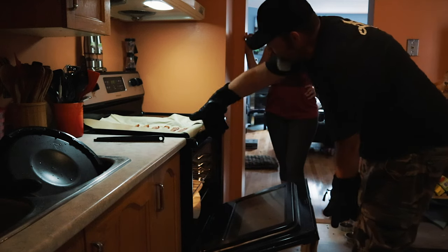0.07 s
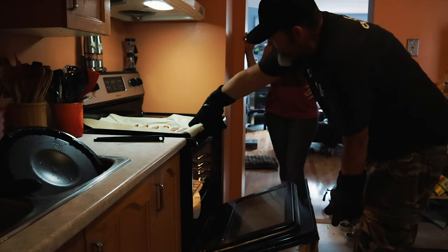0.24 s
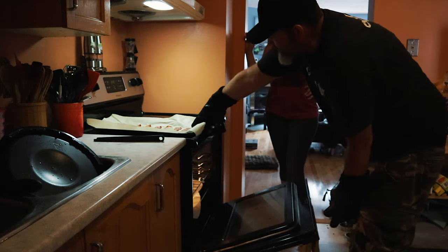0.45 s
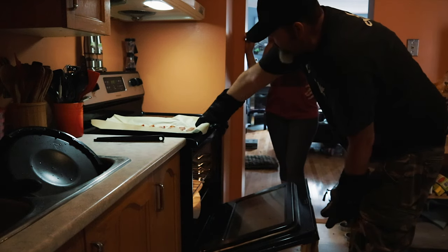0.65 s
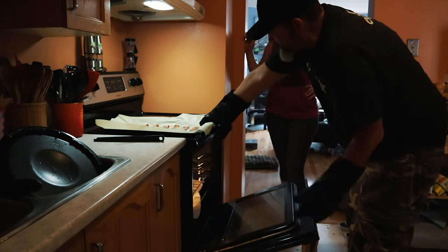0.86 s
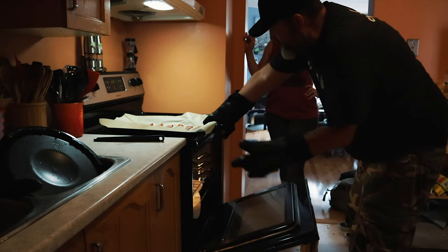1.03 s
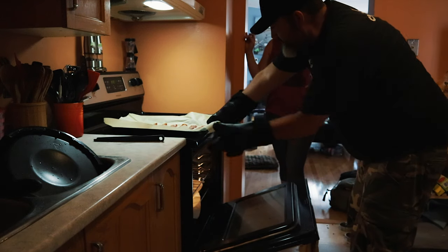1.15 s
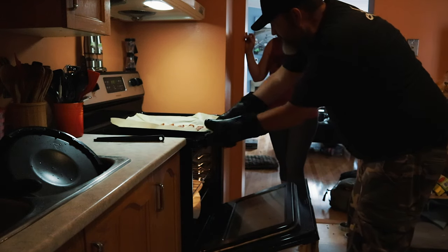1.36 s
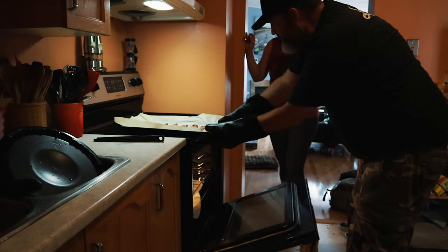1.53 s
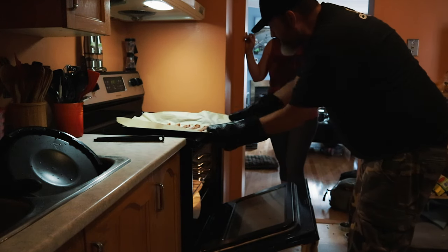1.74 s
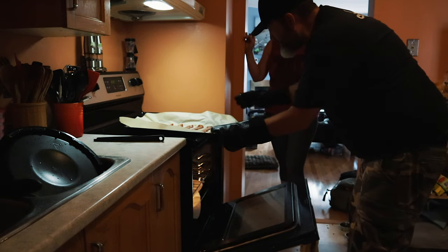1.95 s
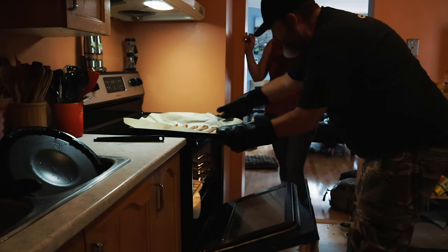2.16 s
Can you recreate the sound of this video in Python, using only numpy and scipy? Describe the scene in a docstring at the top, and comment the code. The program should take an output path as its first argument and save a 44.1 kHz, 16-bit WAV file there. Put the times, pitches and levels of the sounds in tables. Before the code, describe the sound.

A metal sheet pan starts scraping along a hard surface at 0.2 seconds, with small squeaks and crinkling from its paper lining. It knocks down twice, at about 0.85 and 1.0 seconds, ringing briefly. After a short pause, a second scrape runs from 1.4 to 1.9 seconds with thin squeals, paper rustle and soft thumps, then fades. The sound is close, over a faint kitchen appliance hum.

```python
"""In a kitchen, gloved hands tug a paper-lined sheet pan along a hard surface. Sliding friction makes
the pan scrape, drone and squeal; the paper hisses and its creases snap. The pan knocks down twice,
ringing its modes, and flexes with low thumps. An appliance rumbles behind and the walls reverberate.
Two close microphone ports hear the bass alike and the treble differently."""
import sys
import numpy as np
from scipy import signal
from scipy.fft import rfft, irfft, next_fast_len
from scipy.io import wavfile
from scipy.ndimage import map_coordinates

SR = 44100
rng = np.random.default_rng(int(sys.argv[2]) if len(sys.argv) > 2 else 0)


def persist_wave(psi):
    """Save psi, clipped to +-1, as 16-bit WAV."""
    counts = np.round(np.clip(psi, -1, 1) * 32767).astype(np.int16)
    wavfile.write(sys.argv[1], SR, np.atleast_2d(counts).T)


N = 97020

# Normal modes of the pan: (frequency [Hz], level [dB], decay time T60 [s])
PAN_MODES = [(158.6, -8.5, 0.92), (339, -5.5, 0.12), (506, 3, 0.077), (615, 7.5, 0.086), (800.5, -6, 0.28),
             (987, 6.5, 0.12), (1424, -18, 0.61), (1880, -9, 0.087), (1917, -12, 0.076), (2260, 9.5, 0.017),
             (2760, 2, 0.061), (2920, 1, 0.055), (3340, 2.5, 0.033)]
# Spectrum of the room air: (frequency [Hz], relative spectral density [dB])
AIR_SPECTRUM = [(120, -30), (200, -10), (455, -8), (541, -11), (1170, -15), (13000, -41.5)]


def amp(db):
    """Amplitude ratio of a level in decibels."""
    return 10 ** (np.asarray(db) / 20)


def unit_rms(x):
    """Normalisation to a mean square of one."""
    return x / np.sqrt(np.mean(x ** 2) + 1e-20)


def gain_at(points, f):
    """Amplitude response from (frequency [Hz], level [dB]) points joined on a log frequency axis."""
    hz, db = np.transpose(points)
    return amp(np.interp(np.log(f + 1), np.log(hz + 1), db))


def wobble(knots_per_s):
    """Smooth random modulation: a spline through Gaussian values."""
    knots = rng.standard_normal(int(N * knots_per_s / SR) + 4)
    return map_coordinates(knots, [np.arange(N) * knots_per_s / SR])


def filtered(x, response):
    """Linear filtering: the spectrum is multiplied by a complex frequency response."""
    size = next_fast_len(N + SR // 2)
    return irfft(rfft(x, size) * response(np.fft.rfftfreq(size, 1 / SR)), size)[..., :N]


def coloured_noise(response):
    """Spectral shaping of white noise, scaled to unit RMS."""
    return unit_rms(filtered(rng.standard_normal(N), response))


def resonance(f, hz, width_hz):
    """Band-pass response of a damped oscillator."""
    return 1j * f * width_hz / (hz * hz - f * f + 1j * f * width_hz)


def sheet_radiation(f, edge_hz=913):
    """Radiation efficiency: thin sheet and paper give off little bass, a fourth-order high-pass."""
    x = 1j * f / edge_hz
    return (x * x / (1 + x + x * x)) ** 2


def tone_pulse(time, length, hz):
    """Wave packet: a sinusoid under a Gaussian envelope centred on the given time."""
    t = np.arange(N) / SR
    return np.exp(-(2 * (t - time) / length) ** 2) * np.sin(2 * np.pi * hz * t)


def add(track, time, sound):
    """Superposition of a sound on the track, starting at the given time."""
    part = track[max(round(time * SR), 0):][:len(sound)]
    part += sound[:len(part)]


def scatter(x, t60, hop, delay=0):
    """Diffuse scattering: each overlapping frame gets its own decaying tail; hop and delay in samples."""
    out = np.zeros(N + SR)
    window = np.hanning(2 * hop + 1)[:-1]
    decay = amp(-60 * np.arange(SR // 3) / SR / t60)
    x = np.pad(x, (hop, 2 * hop))
    for start in range(0, N + hop, hop):
        tail = rng.standard_normal(len(decay)) * decay
        wet = signal.fftconvolve(x[start:start + 2 * hop] * window, tail / np.linalg.norm(tail))
        out[start:start + len(wet)] += wet
    return np.pad(out, (delay, 0))[hop:hop + N]


def room_air():
    """Ambient noise: a broad band whose level drifts and dips briefly."""
    # Course of the room air: (time [s], level [dB])
    air_levels = [(0, -45), (0.499, -54.5), (.8, -47.5), (1.15, -40.5), (1.45, -44), (1.62, -67),
                  (1.8, -44.5), (2.2, -44)]
    level_db = np.interp(np.arange(N) / SR, *np.transpose(air_levels))
    air = coloured_noise(lambda f: gain_at(AIR_SPECTRUM, f))
    return air * amp(level_db + wobble(knots_per_s=9))


def appliance_hum():
    """Narrow-band noise: the appliance's low bands are heard as a wavering hum."""
    # Bands of the hum: (frequency [Hz], bandwidth [Hz], level [dB])
    bands = [(55, 27, -51.5), (103, 36, -46), (164, 43, -50.5)]
    return sum(amp(db) * coloured_noise(lambda f: resonance(f, hz, width) ** 2) for hz, width, db in bands)


def pan_drone():
    """Forced vibration: dragging drives four low modes of the pan into a hollow murmur."""
    # Course of the drone: (time [s], level [dB])
    drone_levels = [(.2, -47.5), (.26, -37), (.33, -48), (1.4, -57), (1.449, -34), (1.56, -35.5),
                    (1.65, -43.5), (1.8, -31.5), (1.951, -64)]
    level_db = np.interp(np.arange(N) / SR, *np.transpose(drone_levels), left=-120, right=-120)
    low_modes = lambda f: sum(resonance(f, hz, width_hz=100) for hz, _, _ in PAN_MODES[2:6])
    return amp(level_db) * coloured_noise(low_modes)


def pan_thumps():
    """Flexure: the bending pan gives soft low pulses with no ring."""
    # Flexes of the pan: (time [s], peak level [dB], frequency [Hz], duration [s])
    flexes = [(0.897, -20.5, 168.8, 0.027), (1.403, -27.5, 164.4, 0.015), (1.487, -22, 150.6, 0.023),
              (1.54, -24.5, 136, 0.025), (2.07, -34.5, 170.2, 0.036)]
    return sum(amp(db) * tone_pulse(time, length, hz) for time, db, hz, length in flexes)


def edge_chirps():
    """Stick-slip: the pan's edge catches and gives short clean chirps."""
    # Catches of the edge: (time [s], peak level [dB], frequency [Hz])
    catches = [(0.3185, -11, 3250), (0.338, -8, 3380), (0.3722, -9.5, 3325), (.390, -26, 3430),
               (0.455, -12, 3450), (.493, -16.5, 3700), (0.834, -18, 3640), (1.7255, -11.5, 3590),
               (1.737, -12, 3600)]
    return sum(amp(db) * tone_pulse(time, length=0.0022, hz=hz) for time, db, hz in catches)


def pan_squeals():
    """Friction-excited resonance: the sliding pan sings in one narrow band for each squeal."""
    # Squeals: (centre time [s], duration [s], frequency [Hz], level [dB])
    squeals = [(.4, 0.25, 3470, -32), (0.484, 0.047, 1720, -29), (1.103, 0.016, 2450, -26),
               (1.53, 0.16, 2010, -28.5), (1.671, .06, 1990, -28), (1.65, 0.11, 2600, -30.5)]
    out, t = np.zeros(N), np.arange(N) / SR
    for time, length, hz, db in squeals:
        swell = np.cos(np.pi * np.clip((t - time) / length, -0.5, 0.5))
        out += amp(db) * swell * coloured_noise(lambda f: resonance(f, hz, width_hz=260) ** 2)
    return out


def pan_knocks():
    """Impact excitation: a short rough force rings the pan's modes over a decaying noisy clatter."""
    # Impacts: (time [s], relative level [dB], low body gain [dB], contact time [s], favoured mode [Hz])
    impacts = [(0.8284, -20, -18, 0.0049, 2200), (0.857, -9.5, -8.5, 0.028, 1920),
               (0.889, -21.5, 3.5, 0.014, 780), (0.994, -14, -6, 0.014, 2300), (1.009, -28, 6, 0.014, 330),
               (1.879, -38.5, 7, 0.017, 500)]
    # Spectrum of the clatter: (frequency [Hz], relative spectral density [dB])
    clatter_spectrum = [(71, -30), (120, 4), (234, 5.5), (599, 14), (908, 7.5), (1940, 7), (9000, -32),
                        (11700, -60)]
    body_edge_hz, favour_db, trim_db = 1470, 9, -11
    clatter_db, clatter_t60, clatter_attack_s = 13, 0.22, 0.0021
    out, t = np.zeros(N), np.arange(SR // 3) / SR
    for time, db, body_db, contact_s, favoured_hz in impacts:
        modes = np.zeros(len(t))
        for hz, mode_db, t60 in PAN_MODES:
            favoured = abs(hz / favoured_hz - 1) < 0.1
            start_db = mode_db + body_db * (hz < body_edge_hz) + favour_db * favoured + 2 * rng.normal()
            modes += amp(start_db - 60 * t / t60) * np.sin(2 * np.pi * hz * t)
        force = rng.standard_normal(len(t)) * (t < contact_s) * np.sin(np.pi * t / contact_s)
        ring = signal.fftconvolve(modes, force / np.linalg.norm(force))[:len(t)]
        body_shelf = lambda f: amp(body_db / (1 + (f / body_edge_hz) ** 6))
        clatter = coloured_noise(lambda f: gain_at(clatter_spectrum, f) * body_shelf(f))[:len(t)]
        clatter *= amp(clatter_db + body_db / 2 - 60 * t / clatter_t60)
        clatter *= 1 - np.exp(-t / clatter_attack_s)
        add(out, time, amp(db + trim_db) * (ring + clatter))
    return out


def paper_snaps():
    """Buckling: each crease pops in a rough band round its own pitch, with a bright crack."""
    # Snaps of the creases: (time [s], relative level [dB], frequency [Hz], crack re pop [dB])
    creases = [(0.2517, -9.5, 2977, 3), (0.2655, -9.5, 1670, 3), (0.385, -8, 1728, 5.5),
               (0.4533, -13, 2420, -5), (0.573, -32, 5370, -3), (0.655, -21, 2670, 0),
               (0.686, -20.5, 2860, 10), (0.690, -17, 2880, -6), (0.7265, -18.5, 3280, 3),
               (1.1501, -20, 2570, 3.5), (1.4182, -19.5, 3500, -10), (1.5375, -10, 3390, 6),
               (1.626, -9.5, 2716, -16), (1.7353, -7.5, 2000, 0), (1.8009, -13.5, 2250, -6)]
    t60, attack_s, roughness, smoothing_s = 0.022, 0.0026, 1.24, 0.00012
    pops, cracks, t = np.zeros(N), np.zeros(N), np.arange(SR // 8) / SR
    smoothing = np.exp(-t[:SR // 150] / smoothing_s)
    for time, db, hz, crack_db in creases:
        envelope = amp(db - 60 * t / t60) * (1 - np.exp(-t / attack_s))
        noise = rng.standard_normal((3, len(t)))
        in_phase, quadrature = (roughness * unit_rms(np.convolve(x, smoothing)[:len(t)]) for x in noise[:2])
        phase = 2 * np.pi * hz * t
        add(pops, time, envelope * ((1 + in_phase) * np.sin(phase) + quadrature * np.cos(phase)))
        add(cracks, time, envelope * amp(crack_db) * noise[2])
    pops = filtered(pops, lambda f: resonance(f, hz=3000, width_hz=10000) ** 2 * sheet_radiation(f))
    return pops + filtered(cracks, lambda f: resonance(f, hz=5200, width_hz=15000) ** 2)


def friction_grains():
    """Shot noise: dense small catches, each a damped oscillation of a few cycles at its own pitch."""
    grains_per_s, centre_hz, decay_cycles = 1500, 2687, 1.8
    log_pitch_spread, level_spread_db = 0.374, 1.5
    count, samples = int(grains_per_s * N / SR), np.arange(SR // 160)
    starts = (rng.random((count, 1)) * N).astype(int)
    pitch_draw, level_draw = np.hsplit(rng.standard_normal((count, 2)), 2)
    cycles = centre_hz * np.exp(log_pitch_spread * pitch_draw) * samples / SR
    grains = amp(level_spread_db * level_draw) * np.sin(2 * np.pi * cycles) * np.exp(-cycles / decay_cycles)
    train = np.bincount((starts + samples).ravel(), grains.ravel(), N + len(samples))[:N]
    return unit_rms(filtered(train, lambda f: resonance(f, centre_hz, width_hz=4100) ** 2))


def scrape_and_hiss():
    """Sliding friction: the pan's resonant scrape and the paper's hiss follow the hand movement."""
    # Hand movement: (time [s], scrape level [dB], paper hiss level [dB])
    movement = [(0.19, -58, -77), (.213, -48, -70), (0.221, -32.5, -38), (0.259, -21, -25),
                (0.288, -30, -31), (.33, -24.5, -25), (.36, -26.5, -28.5), (0.393, -24, -25),
                (.43, -28.5, -30.5), (0.462, -24, -27), (.5, -34.5, -32.5), (0.556, -41.5, -49.5),
                (0.57, -28.5, -28), (.61, -28.5, -35), (.645, -34, -37.5), (.69, -33.5, -30.5),
                (.74, -36, -34), (.785, -44.5, -47), (0.801, -46, -33.5), (.826, -36, -38.5),
                (.9, -33, -37.5), (.96, -34, -45), (1.065, -31, -36.5), (1.12, -35, -44.5),
                (1.155, -37, -44.5), (1.2, -47, -48.5), (1.26, -62, -93), (1.305, -52, -48.5),
                (1.34, -62, -66), (1.349, -35.5, -52.5), (1.41, -39, -49), (1.439, -29.5, -32),
                (1.5, -27.5, -30), (1.552, -22, -20.5), (1.6, -29, -31), (1.65, -26.5, -27),
                (1.705, -27.5, -28.5), (1.74, -25, -26.5), (1.802, -26.5, -25.5), (1.88, -35, -41.5),
                (2.014, -56, -57.5), (2.033, -38, -35), (2.11, -46.5, -54), (2.2, -48.5, -40.5)]
    # Spectrum of the pan's friction noise: (frequency [Hz], relative spectral density [dB])
    scrape_spectrum = [(600, -13), (950, -3), (1940, 3), (3390, 2), (6000, -8.5), (7800, -31)]
    # Pan resonances that colour the scrape: (frequency [Hz], bandwidth [Hz], gain [dB])
    pan_peaks = [(1104, 42, -2), (2790, 170, -7)]
    # Spectrum of the paper's hiss: (frequency [Hz], relative spectral density [dB])
    hiss_spectrum = [(2350, -23), (4000, -11), (5620, -11.5), (9050, -15.5), (11700, -17), (15100, -26),
                     (15500, -54)]
    grain_share, lift_s, lifted_edge_hz = 0.32, 1.3, 1400
    t = np.arange(N) / SR
    times, scrape_db, hiss_db = np.transpose(movement)
    flicker = amp(1.2 * wobble(knots_per_s=90))
    scrape_noise, hiss_noise = rng.standard_normal((2, N))

    pan_colour = lambda f: 1 + sum(amp(db) * resonance(f, hz, width) for hz, width, db in pan_peaks)
    friction = unit_rms(filtered(scrape_noise, lambda f: gain_at(scrape_spectrum, f) * pan_colour(f)))
    friction = np.sqrt(1 - grain_share) * friction + np.sqrt(grain_share) * friction_grains()
    flat = filtered(friction, sheet_radiation)
    lifted = filtered(friction, lambda f: sheet_radiation(f, lifted_edge_hz))  # front raised: less bass
    scrape = np.where(t < lift_s, flat, lifted) * amp(np.interp(t, times, scrape_db, left=-120))

    rustle = hiss_noise * amp(1.5 * wobble(knots_per_s=700))
    hiss = unit_rms(filtered(rustle, lambda f: gain_at(hiss_spectrum, f)))
    hiss *= amp(np.interp(t, times, hiss_db, left=-120))
    return flicker * (scrape + hiss)


def scene():
    """Superposition of direct sound, reverberation and background; the ports differ mainly in treble."""
    # Difference between the ports: (frequency [Hz], side level re mid [dB])
    port_difference = [(40, -32), (180, -27), (500, -20), (1400, -19), (2200, -14), (3300, -5), (5600, 0),
                       (10000, 1), (14000, 4)]
    direct = scrape_and_hiss() + edge_chirps() + pan_squeals() + pan_drone()
    direct += paper_snaps() + pan_knocks() + pan_thumps()
    walls = amp(-10.5) * scatter(direct, t60=0.22, hop=SR // 10, delay=SR // 200)
    mid = direct + walls + room_air() + appliance_hum()
    side = filtered(scatter(mid, t60=0.042, hop=SR // 25), lambda f: gain_at(port_difference, f))
    side += amp(-53.5) * coloured_noise(lambda f: gain_at(AIR_SPECTRUM, f))  # diffuse air
    return np.array([mid + side, mid - side])


def record(dry):
    """Band limiting: the microphone fades in the top octave and passes nothing above its limit."""
    # Microphone response: (frequency [Hz], gain [dB])
    microphone = [(11500, 1), (13000, -4.5), (15000, -19.5)]
    limit_hz = 15800
    return filtered(dry, lambda f: gain_at(microphone, f) * (f < limit_hz))


dry = scene()
out = record(dry)
persist_wave(out)
```